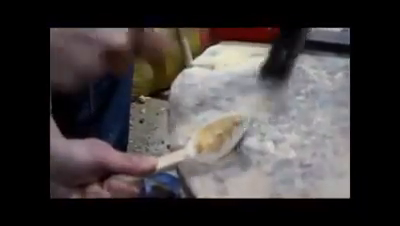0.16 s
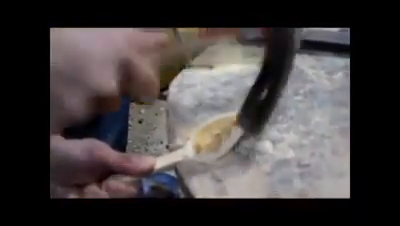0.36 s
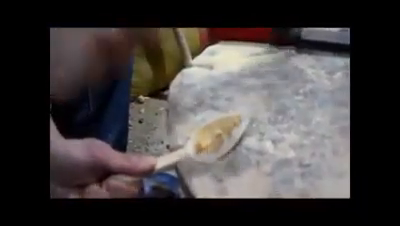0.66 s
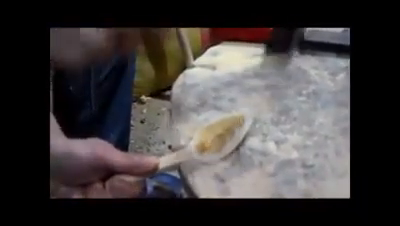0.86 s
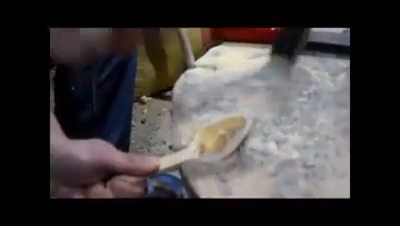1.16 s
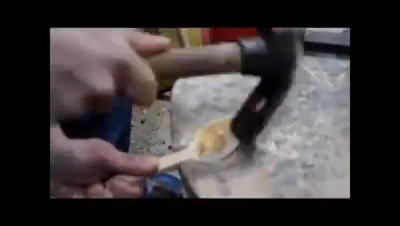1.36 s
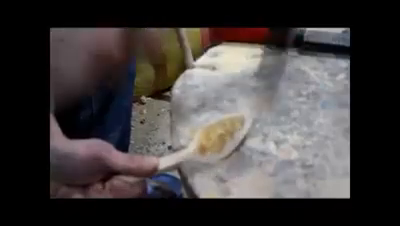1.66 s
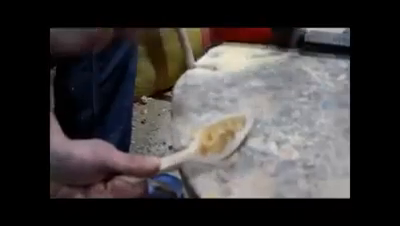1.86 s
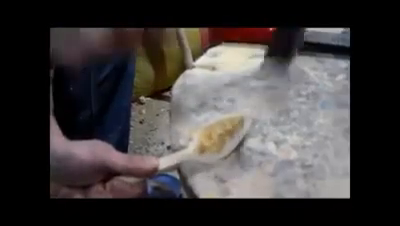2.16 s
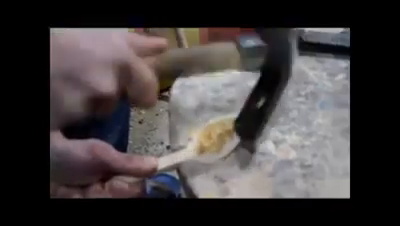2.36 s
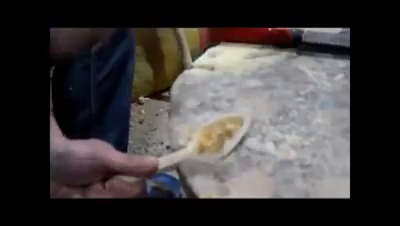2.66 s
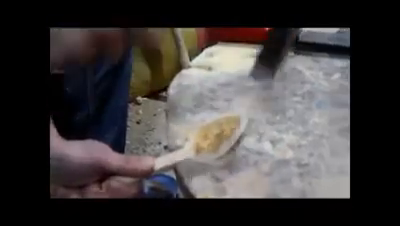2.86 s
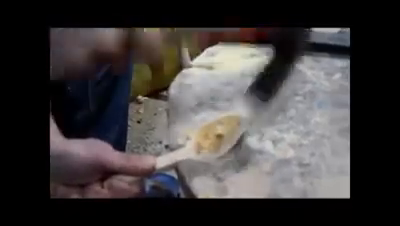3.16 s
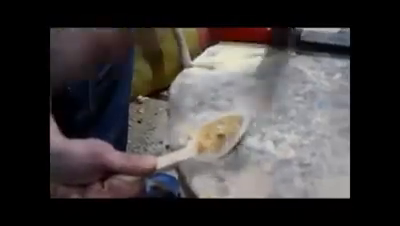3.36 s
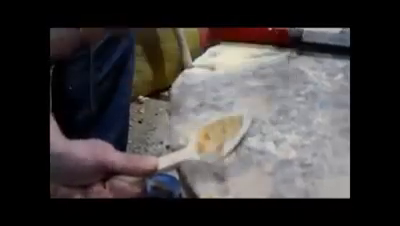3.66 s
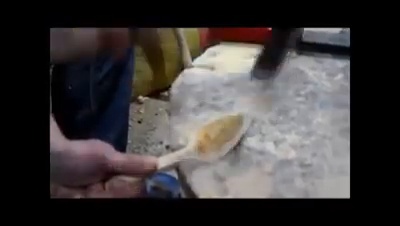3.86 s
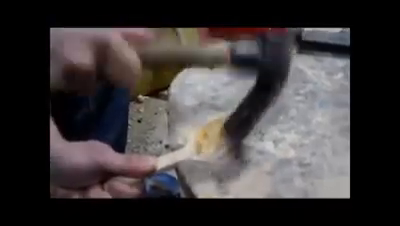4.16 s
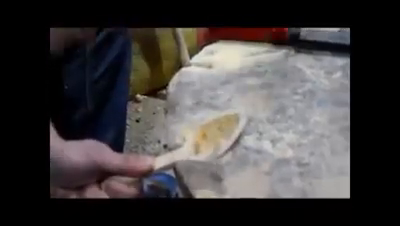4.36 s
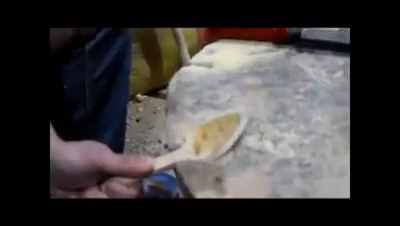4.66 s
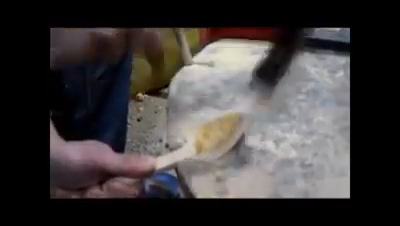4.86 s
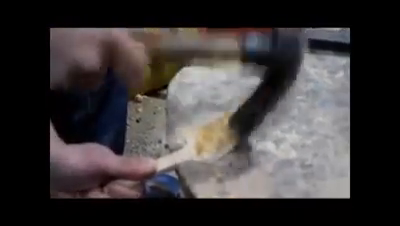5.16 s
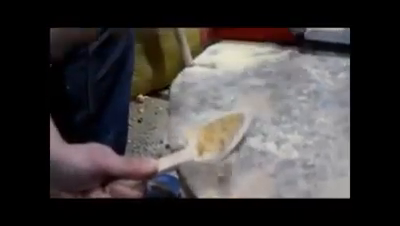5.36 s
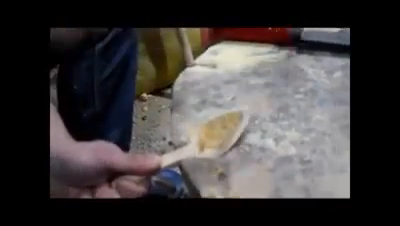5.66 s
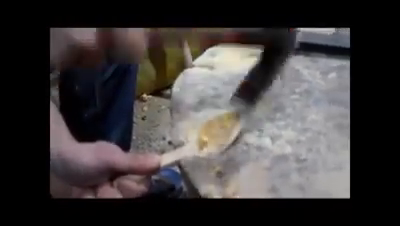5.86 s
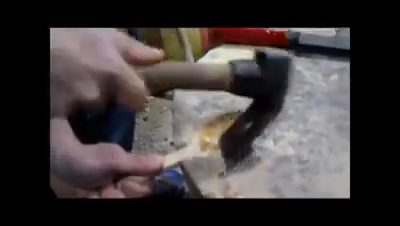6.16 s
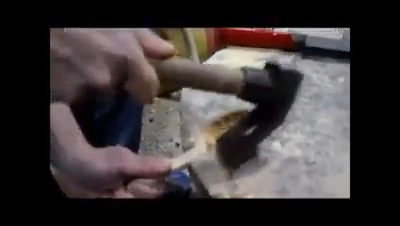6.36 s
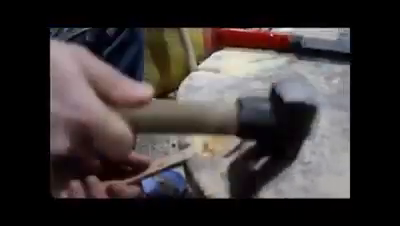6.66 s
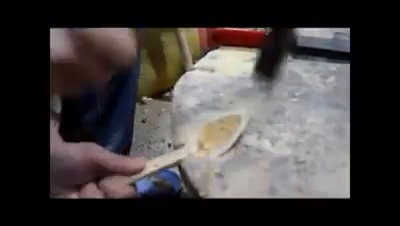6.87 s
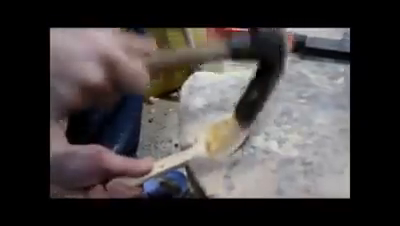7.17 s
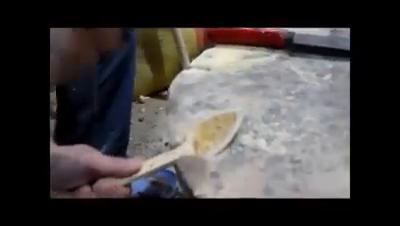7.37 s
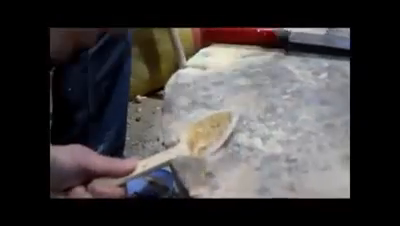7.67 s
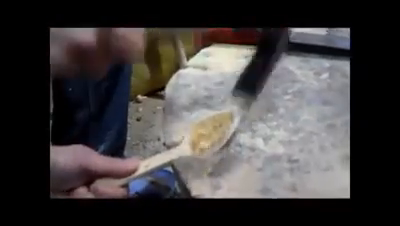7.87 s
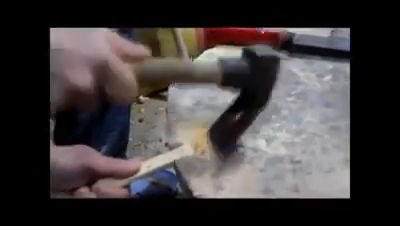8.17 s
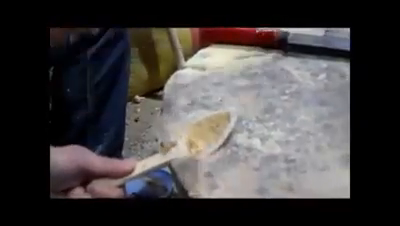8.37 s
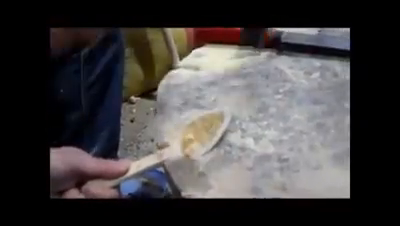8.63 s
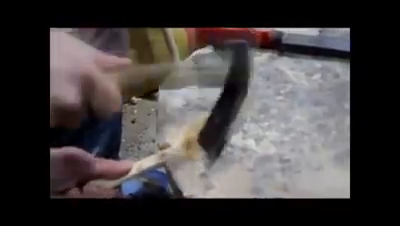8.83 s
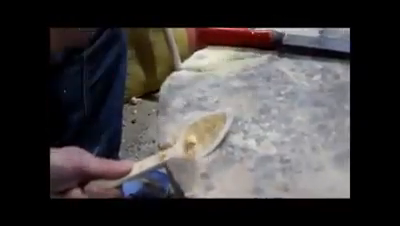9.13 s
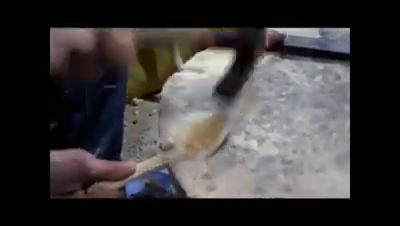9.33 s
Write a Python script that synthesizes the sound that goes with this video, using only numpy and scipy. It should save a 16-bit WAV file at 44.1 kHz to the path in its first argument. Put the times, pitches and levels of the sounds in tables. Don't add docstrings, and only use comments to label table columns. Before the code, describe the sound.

Wood carving in a small, reverberant workshop: abrupt chops, very loud and clipped at the near microphone, repeat at a steady brisk pace. Each bite splits fibres with a bright snap, a hollow woody tone and a thud from the block. Around the middle there is a one-second gap with a few blunt tool taps and light scuffs, then seven more chops. Faint chip ticks fill the gaps over a distant hum.

```python
import sys
import numpy as np
from scipy import signal
from scipy.io import wavfile

SR = 44100
rng = np.random.default_rng(int(sys.argv[2]) if len(sys.argv) > 2 else 0)


def amplitude_ratio(level_db):
    exponent = np.asarray(level_db, float) / 20
    return 10 ** exponent


def to_wav(s):
    ch = np.atleast_2d(s).T
    pcm = np.round(np.clip(ch, -1, 1) * 32767)
    wavfile.write(sys.argv[1], SR, pcm.astype(np.int16))


N = 418950
LEAD = SR // 2

# start_s, cut_ms, weight_db, edge_db
BLOWS = [(0.2062, 2.45, -30, -34), (0.5303, 1, -29.5, -36), (0.8532, 4.05, -24.5, -32.5),
         (1.1816, 2.6, -25.5, -34), (1.5094, 1.1, -30.5, -26.5), (1.8415, 3.1, -26, -28.5),
         (2.1792, 3.84, -24.5, -28), (2.5237, 2.8, -23.5, -29.5), (2.8687, 4.3, -26.5, -22.5),
         (3.2164, 2.9, -23, -24), (3.5627, 4.1, -28, -28), (3.914, 2.7, -21, -26), (4.2544, 3.5, -33, -30),
         (4.5916, 4, -29, -28), (4.9258, 4.5, -21.5, -28.5), (5.2519, 5.1, -24, -26.5),
         (5.5873, 5.5, -24, -23.5), (5.9203, 6.6, -27, -28.5), (6.2506, 4.7, -25.5, -23.5),
         (7.2696, 9.7, -30.5, -48), (7.598, 4.5, -28.5, -35.5), (7.931, 2.9, -29.5, -27),
         (8.2798, 0.85, -31, -34), (8.6434, 7.5, -32, -35), (9.0065, 7.5, -31, -30),
         (9.3664, 4.8, -22, -33.5)]
# start_s, cut_ms, weight_db, edge_db
EARLIER_BLOW = (-SR / 8 / SR, 3.5, -26, -35)
# crack_hz, crack_peak_db, bowl_hz, bowl_db
BLANK = [(1980, 4, 416, -30), (1730, 5, 422.5, -22), (1790, 4, 402, -35), (1480, 10, 434, -28),
         (1800, 8.5, 425, -32), (1810, 6, 1000, -38), (1790, 2.5, 370, -44), (2160, 9, 404, -29),
         (1870, 6.5, 434, -23.5), (2250, 7, 970, -44), (1790, 2, 450, -28), (1670, 10, 210, -39),
         (1850, -3, 450, -32), (2390, -2.5, 170, -39), (1880, 3, 703, -39), (2880, -7, 321.5, -28),
         (2180, -7, 323, -31.5), (3400, -11, 464, -24), (2510, -6, 460, -30.5), (1780, -12, 490, -35),
         (2070, -3.5, 870, -47), (1960, 6, 428, -28), (2450, 2, 467, -22), (1870, -10.5, 432, -34),
         (2050, -10, 469, -27.5), (2670, -2, 1600, -33)]
# start_s, peak_db, contact_hz, block_db
TAPS = [
    (6.416, -10.5, 440, -39),
    (6.454, -22, 414, -46),
    (6.753, -13, 506, -43),
]

MEAN_WEIGHT_DB, MEAN_EDGE_DB = -25, -30
STEEL_HZ = 3470


def at_hz(points, hz, count=1):
    points = np.array(points)
    return np.interp(np.log(hz), np.log(points[:, 0]), points[:, count])


def band(x, low_hz, high_hz, order=2):
    sos = signal.butter(order, [low_hz, min(high_hz, 20000)], "band", fs=SR, output="sos")
    return signal.sosfilt(sos, x)


def ring(x, hz, t60):
    radius = amplitude_ratio(-60 / (t60 * SR))
    angle = 2 * np.pi * hz / SR
    return signal.lfilter([0, np.sin(angle)], [1, -2 * radius * np.cos(angle), radius ** 2], x + 1e-18)


def add(track, start_s, sound):
    i = max(round(start_s * SR) + LEAD, 0)
    track[i:i + len(sound)] += sound[:len(track) - i]


def burst(hold_ms, fade_ms, size=2048):
    t_ms = np.arange(size) / SR * 1000
    return rng.standard_normal(size) * np.exp(-np.maximum(t_ms - hold_ms, 0) / fade_ms)


def peak_one(x):
    return x / np.max(np.abs(x))


def noise_bank(size, gain_of_band):
    edges = 30 * 2 ** (np.arange(29) / 3)
    white = rng.standard_normal((2, size))
    total = 0
    for k, (low, high) in enumerate(zip(edges, edges[1:])):
        total = total + gain_of_band(np.sqrt(low * high)) * band(white[k % 2], low, high)
    return total


def boom(weight_db):
    return -30.5 + 1.4 * (weight_db - MEAN_WEIGHT_DB)


def hum():
    # band_hz, level_db
    spectrum = [(18, -56), (30, 2), (91, -8.5), (112, -1.5), (235, -1), (306, -2), (480, -1), (593, -9),
                (928, -5.5), (1120, -11.5), (2600, -14.5), (2890, -22), (4290, -23.5), (13700, -45),
                (16500, -41)]
    x = noise_bank(N + LEAD, lambda hz: amplitude_ratio(at_hz(spectrum, hz)))
    return amplitude_ratio(-43.5) * x / np.std(x)


def workshop(small, sung):
    # band_hz, echo_db, t60_s
    room = [(59.7, -17.5, 0.91), (118, -12.5, 0.49), (274, -5.5, 0.17), (463, -7, 0.42), (940, -11.5, 0.46),
            (1300, -12, 0.65), (1890, -1, 0.4), (3960, -5, 0.43), (6500, -0.5, 0.34), (9000, -8.5, 0.31),
            (12200, -5.5, 0.24), (16100, -14, 0.24)]
    limits = [90, 300, 1000, 4000, 17000]
    t = np.arange(SR) / SR
    echo = noise_bank(SR, lambda hz: amplitude_ratio(at_hz(room, hz) - 60 * t / at_hz(room, hz, count=2)))
    echo *= 1 - np.exp(-np.maximum(t - .002, 0) / 0.0038)
    sent = amplitude_ratio(-34.0) * small + sung
    for (s, _, weight_db, edge_db), (crack_hz, crack_db, *_) in zip([EARLIER_BLOW, *BLOWS], [BLANK[0], *BLANK]):
        snap_db = -32.5 + 0.48 * (weight_db - MEAN_WEIGHT_DB) + 0.19 * (edge_db - MEAN_EDGE_DB)
        snap_db -= 0.052 * crack_db
        levels_db = boom(weight_db), weight_db, edge_db, snap_db
        blow = .04 * burst(1.5, fade_ms=2.0)
        blow[0] += 1
        # (Hz, dB, pitch ratio to each side)
        colours = (crack_hz, -10 + 0.83 * crack_db, 1.13), (STEEL_HZ, -27, 1.15), (7980, -3, 1.05)
        blow += sum(amplitude_ratio(db) * band(blow, hz / wide, hz * wide, order=1) for hz, db, wide in colours)
        for k, (low, high, level_db) in enumerate(zip(limits, limits[1:], levels_db)):
            part = band(blow, low, high) * (-1) ** k
            part *= np.sqrt(SR / 2 / (high - low) / np.sum(part ** 2))
            add(sent, s, amplitude_ratio(level_db - 4.5) * part)
    return signal.fftconvolve(sent, echo)[:N + LEAD]


def block():
    # mode_hz, level_db, t60_s
    modes = [(91, 8, 0.067), (130.5, -39, 0.52), (148.4, 2, 0.55), (149.5, -55, 0.27), (221.3, -40.5, 1),
             (286.4, 0.5, 0.39), (326.6, -22.5, 0.73), (424.6, -26.5, 0.23), (468.2, -20, 0.29),
             (547, -36, 1), (690, 11, 0.16), (842, -16, 0.12), (843.6, -22, 0.27), (1031, -24, 0.47)]
    hits = [(s, boom(weight_db), weight_db, bowl_hz) for (s, _, weight_db, _), (_, _, bowl_hz, _)
            in zip([EARLIER_BLOW, *BLOWS], [BLANK[0], *BLANK])]
    hits += [(s, db, db, hz) for s, _, hz, db in TAPS]
    s, boom_db, thud_db, thud_hz = np.transpose(hits)
    at = np.round(s * SR).astype(int) + LEAD
    spread_db = rng.normal(0, 0.62, (len(hits), len(modes)))
    out = 0
    for k, (hz, level_db, t60) in enumerate(modes):
        near_db = 6.2 * np.exp(-(np.log(hz / thud_hz) / 0.21) ** 2)
        strike_db = boom_db if hz < 300 else thud_db
        clicks = np.zeros(N + LEAD)
        clicks[at] = amplitude_ratio(strike_db + .5 * level_db - 7.5 + near_db + spread_db[:, k])
        swelling = ring(clicks, hz, 4.6 / hz)
        out = out + ring(swelling, hz, t60) * hz / 6000
    return out


def grazes():
    out = np.zeros(N + LEAD)
    for s, _, _, edge_db in BLOWS:
        swell = band(burst(.1, fade_ms=1.3, size=512)[::-1], 1700, 11600)
        add(out, s - 512 / SR, amplitude_ratio(-31.5 + edge_db - MEAN_EDGE_DB) * swell)
    return out


def cracks():
    out = np.zeros(N + LEAD)
    t = np.arange(2048) / SR
    opening = 1 - np.exp(-(t / 0.0063) ** 2)
    entry = 1 - np.exp(-(t / 0.00033) ** 2)
    for (s, cut_ms, _, edge_db), (crack_hz, crack_db, *_) in zip(BLOWS, BLANK):
        split = burst(max(cut_ms - 1.2, .3), max(2.93 - 0.66 * cut_ms, .9))
        split[0] += 16.5 * rng.choice([-1, 1])
        blank = peak_one(ring(split, crack_hz, 0.0029)) + 0.61 * peak_one(band(split, 1440, 3440))
        hiss = peak_one(band(split * opening, 7900, 12800))
        steel = peak_one(ring(split, STEEL_HZ, 0.00062)) + 0.07 * hiss
        steel_db = -2.5 + 6 + 0.44 * (edge_db - MEAN_EDGE_DB)
        add(out, s - .00025, entry * (amplitude_ratio(crack_db + 5) * blank + amplitude_ratio(steel_db) * steel))
    return out


def bowl():
    out = np.zeros(N + LEAD)
    for (s, *_), (*_, hz, level_db) in zip(BLOWS, BLANK):
        shaking = burst(22.0, fade_ms=42.6, size=16384)
        add(out, s + 0.004, amplitude_ratio(level_db + 5.0) * peak_one(ring(shaking, hz, 0.16)))
    return out


def ticks():
    # start_s, peak_db, pitch_hz
    touches = [(0.5185, -24, 6500), (3.911, -16, 4450), (4.910, -47, 6500), (6.414, -29.5, 6050),
               (6.443, -24.5, 1790), (6.465, -39, 6100), (6.477, -31, 4150), (6.751, -19, 3400),
               (7.211, -26.5, 1900), (7.211, -32, 6000), (7.2585, -34, 6000), (7.265, -34, 3500),
               (8.2753, -27, 5000)]
    # start_s, peak_db, pitch_hz
    falls = [(1.055, -56, 5000), (1.653, -36, 7400), (2.018, -40, 5460), (2.055, -46, 6000),
             (3.143, -43, 6000), (3.699, -28.5, 5400), (3.865, -37, 3440), (4.205, -37, 1500),
             (4.716, -29, 1300), (4.845, -44, 5000), (4.844, -31, 1350), (5.15, -37.5, 5800),
             (5.776, -25, 1410), (5.85, -36, 6030), (6.517, -48, 5000), (6.640, -38, 5500),
             (7.462, -37, 4500), (7.826, -35, 4400), (8.319, -27, 8000)]
    out = np.zeros(N + LEAD)
    for s, peak_db, hz in touches + falls:
        tick_ms = 3.6 + .04 * peak_db
        tick = band(burst(.2, fade_ms=tick_ms / 2), hz / 1.3, hz * 1.3, order=3)
        add(out, s, amplitude_ratio(peak_db) * peak_one(tick))
    return out


def rustles():
    # start_s, length_ms, level_db, centre_hz, width_octaves
    brushes = [(0.52, 11, -30, 5960, 5.9), (1.66, 42, -51, 9000, 0.74), (1.684, 57, -40.5, 8100, 0.92),
               (2.04, 49, -64, 13000, .8), (3.335, 23, -52, 12000, 1.4), (3.686, 18, -50, 9000, 2.5),
               (5.36, 25, -52, 12000, 1.4), (5.449, 360, -53, 5600, 0.45), (5.679, 420, -50.5, 5640, 0.56),
               (6.40, 43, -46.5, 9000, 2.5), (6.699, 92, -52.5, 10900, 2), (7.82, 18, -49, 8550, 0.45),
               (8.318, 11, -33, 9900, 1.5), (8.32, 46, -66, 12600, .04)]
    out = np.zeros(N + LEAD)
    for s, length_ms, level_db, hz, octaves in brushes:
        t = np.arange(8192) / SR * 1000 / length_ms
        grain_db = 2.4 * rng.standard_normal(len(t) // 64).repeat(64)
        grains = rng.standard_normal(len(t)) * amplitude_ratio(grain_db)
        grains = band(grains, hz * 2 ** (-octaves / 2), hz * 2 ** (octaves / 2))
        envelope = np.minimum(6 * t, 1) * np.exp(-1.5 * t ** 1.25)
        add(out, s, amplitude_ratio(level_db) * grains / np.std(grains) * envelope)
    return out


def splinters():
    # start_s, pitch_hz, level_db
    songs = [(0.532, 7100, -34), (1.8412, 2250, -22), (2.1786, 1800, -28), (2.8703, 2450, -22),
             (2.8685, 5460, -38), (3.5627, 1510, -25), (4.2543, 1850, -24.5), (4.5914, 4400, -31),
             (5.9202, 866, -36.5), (5.922, 4500, -36), (7.598, 4350, -25), (7.599, 7000, -30),
             (7.931, 2090, -22), (8.2798, 1650, -24.5), (8.6433, 955, -33), (9.367, 4500, -23),
             (1.5095, 3030, -34), (4.5914, 3260, -32), (6.2508, 5230, -27), (6.2508, 3530, -32),
             (7.929, 3860, -39), (7.931, 7000, -31)]
    sent, near = np.zeros(N + LEAD), np.zeros(N + LEAD)
    pluck = signal.unit_impulse(2048)
    for s, hz, db in songs:
        song = band(pluck, hz / 1.05, hz * 1.05, order=1)
        add(sent, s, amplitude_ratio(db + 5) * song)
        add(near, s, amplitude_ratio(db + 21.5) * peak_one(song))
    return sent, near


def taps():
    out = np.zeros(N + LEAD)
    for s, peak_db, hz, _ in TAPS:
        push = burst(.5, fade_ms=11.5)
        push[0] += 12
        thump = ring(ring(push, 1.75 * hz, 0.0021), hz, 0.015)
        add(out, s, amplitude_ratio(peak_db) * peak_one(thump + 9.0 * band(push, 900, 3000)))
    return out


def scene():
    small = ticks() + rustles() + taps()
    sung, near = splinters()
    mix = hum() + workshop(small, sung) + block() + grazes() + cracks() + bowl() + small + near
    return mix[None, LEAD:]


def low_pass(x):
    return signal.sosfilt(signal.butter(12, 16980, fs=SR, output="sos"), x)


def record(dry):
    top, knee = .53, 5
    flat = dry / (1 + np.abs(dry / top) ** knee) ** (1 / knee)
    thin = signal.sosfilt(signal.butter(2, 85, "high", fs=SR, output="sos"), flat)
    lifted = thin + 0.2 * band(thin, 2200, 14400, order=1)
    cut = signal.sosfilt(signal.cheby2(10, 60, 17100, fs=SR, output="sos"), lifted)
    return low_pass(cut)


dry = scene()
out = record(dry)
to_wav(out)
```